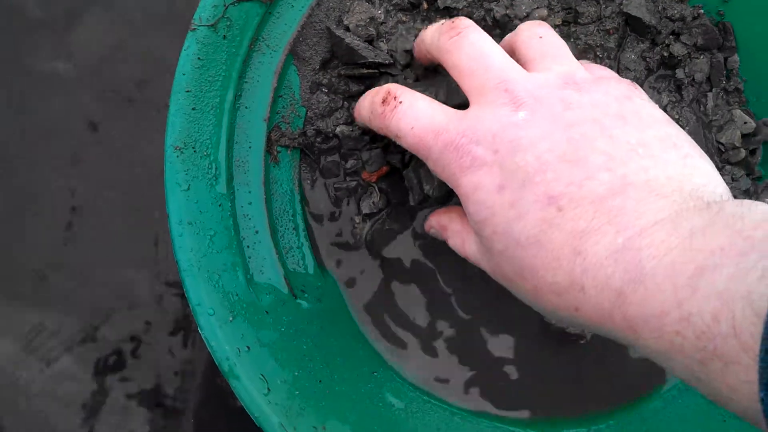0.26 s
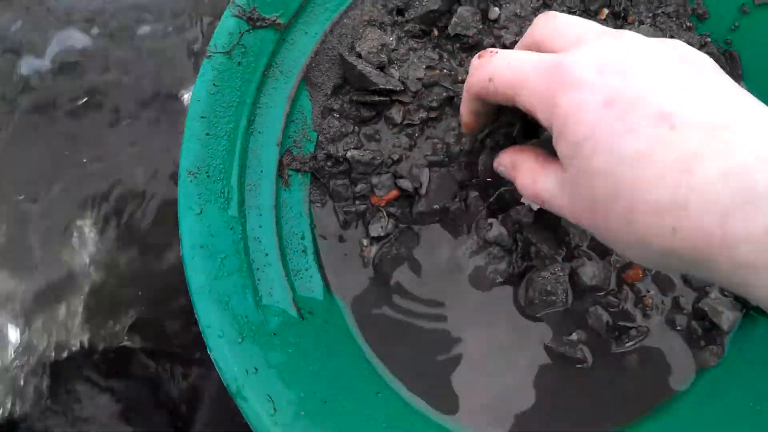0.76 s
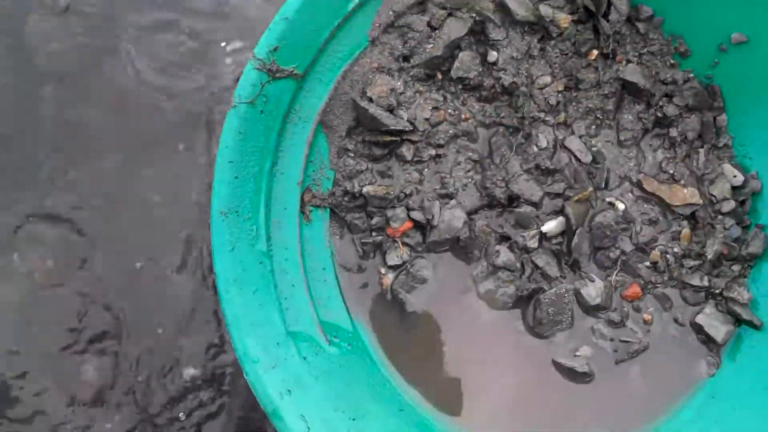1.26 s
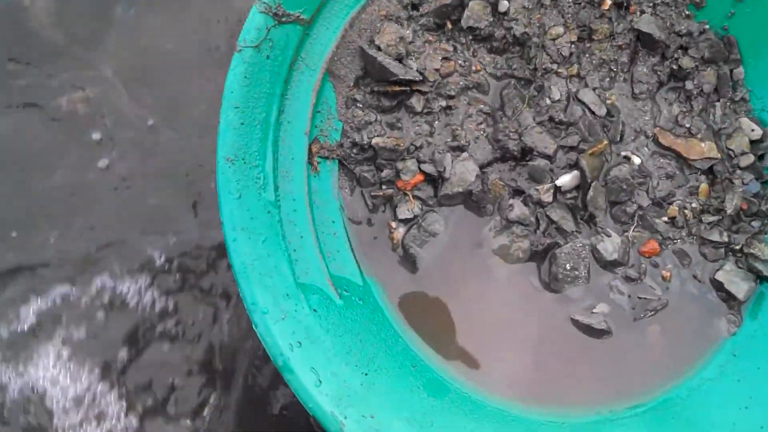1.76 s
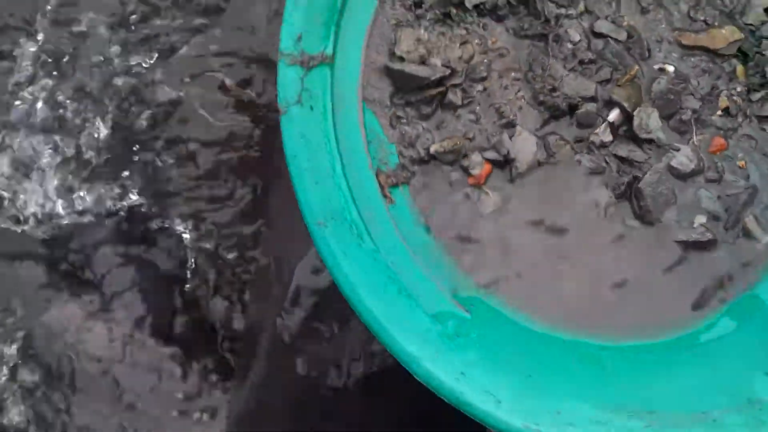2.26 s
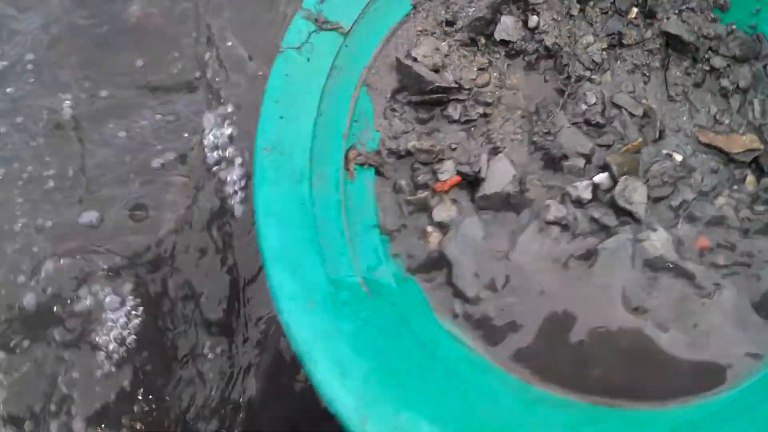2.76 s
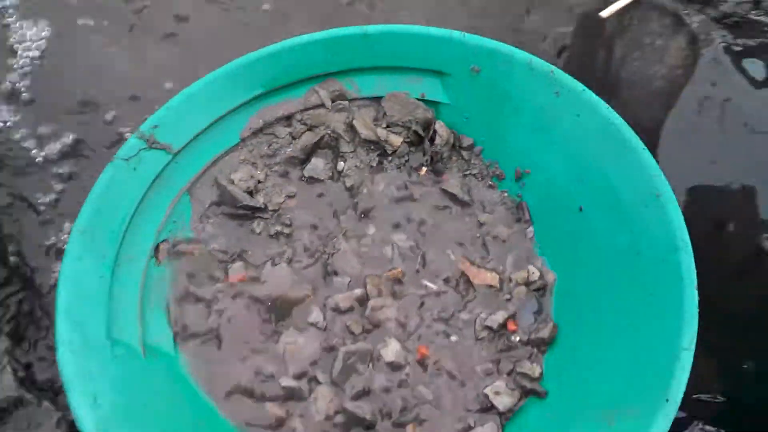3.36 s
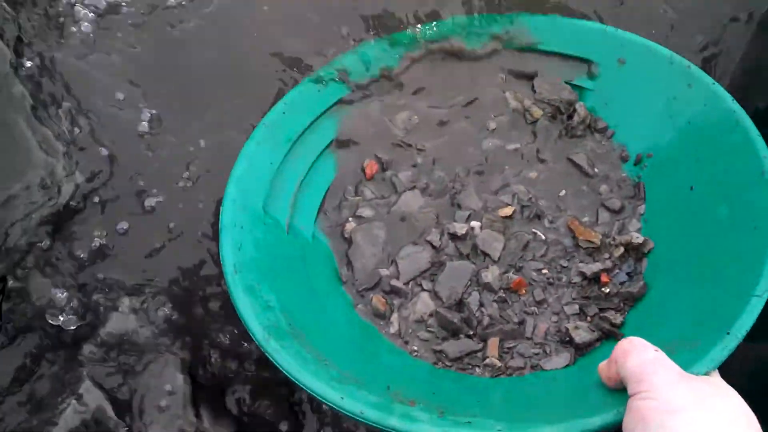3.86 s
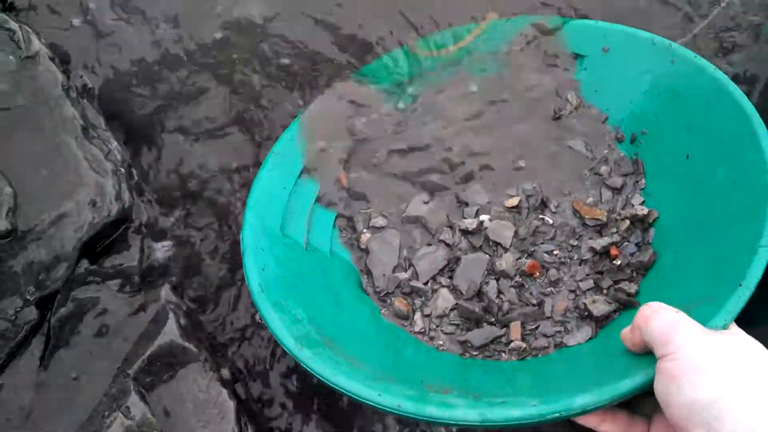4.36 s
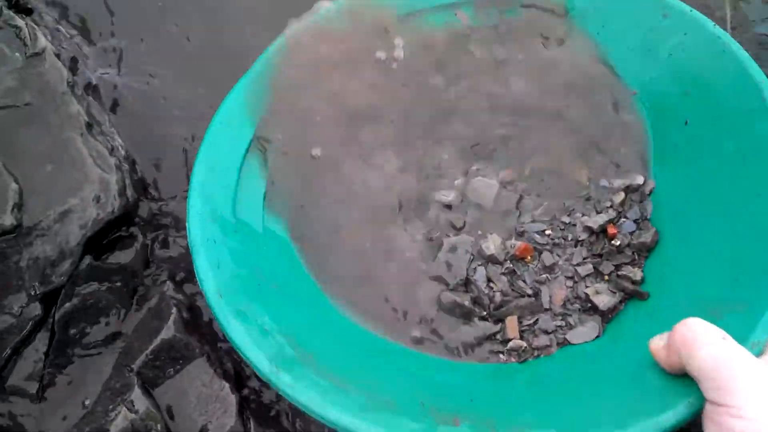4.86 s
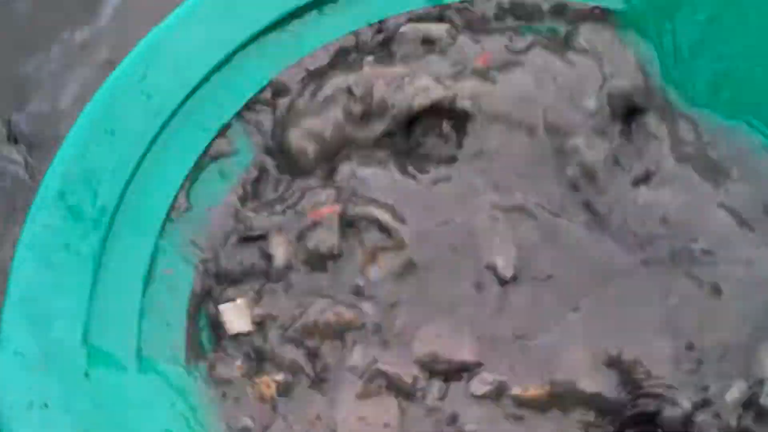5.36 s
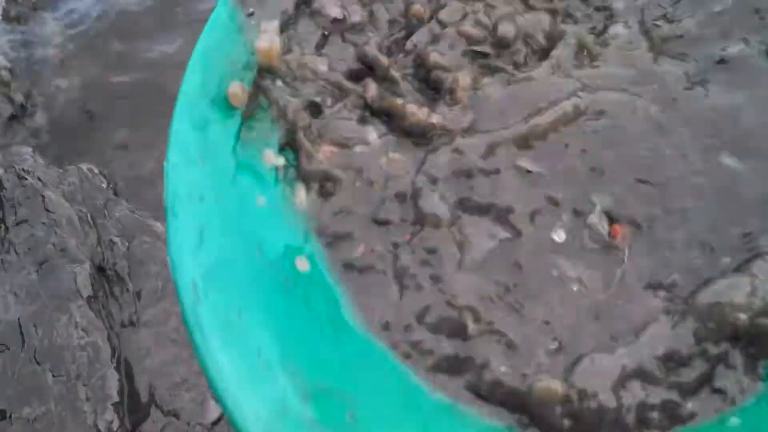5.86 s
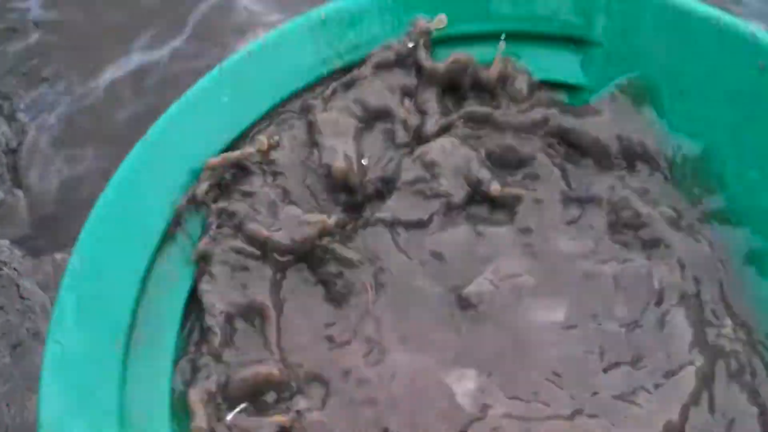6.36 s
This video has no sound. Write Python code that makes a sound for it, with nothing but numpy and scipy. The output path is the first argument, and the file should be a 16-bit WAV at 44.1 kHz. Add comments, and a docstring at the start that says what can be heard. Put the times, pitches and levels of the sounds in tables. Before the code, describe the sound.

Very close stereo sound at an open riverbank. From 0 to 3 seconds, gravel is stirred in a shallow plastic pan of water: irregular bubbly lapping, gurgling and bright fizz swell and fall several times a second, dotted with short pebble ticks, watery drips, hollow low plops and crackling spray, busiest around 2.3 to 2.9. Just after 3 the water drops away, leaving small drips, faint high river hiss and a sparse patter of droplets, with soft wind thumps around 3.3. From 4.2 splashing returns, brightest near 4.6, then loose swirling sloshes and knocks continue to the abrupt end at about 6.6. Wind rumbles low on the microphone throughout; after 4.8 its gusts grow strong, with heavy, boomy buffets near 4.9, 5.6 and 6.2, pushing the two sides in opposite phase. The space is dry, without noticeable echo.

```python
"""A pan of wet gravel is raked, lifted, dipped and shaken at a river's edge, close to two microphone ports.
For 3 s bubble swarms lap, gurgle and fizz under dying-sine drips, plops and filtered-noise spray.
The water thins for about a second, over a far hiss and patter, then sloshes again from 4.2 s.
Low noise rumbles as wind throughout, with the strongest gusts after 4.8 s; ringing eddies thump the ports.
Wind and thumps push the two ports in opposite phase."""
import sys
import numpy as np
from scipy import signal
from scipy.fft import rfft, irfft, next_fast_len
from scipy.io import wavfile
from scipy.ndimage import uniform_filter1d

SR = 44100
rng = np.random.default_rng(int(sys.argv[2]) if len(sys.argv) > 2 else 0)


def master(y):
    """Save y as 16-bit WAV."""
    cut = np.clip(np.atleast_2d(y).T, -1, 1)
    pcm = np.round(cut * 32767)  # scale
    wavfile.write(sys.argv[1], SR, pcm.astype(np.int16))


N = 291059


def gain_of(db):
    """Turns dB into an amplitude factor."""
    return 10 ** (np.asarray(db) / 20)


def evened(x):
    """Scales a signal to rms 1."""
    return x / np.sqrt(np.mean(x ** 2) + 1e-20)


def read(points, hz):
    """Reads a table on a log-frequency axis."""
    f, value = np.transpose(points)
    return np.interp(np.log(hz + 1), np.log(f + 1), value)


def curves(rows):
    """Draws the columns of a time table as straight lines, at every sample."""
    s, *columns = np.transpose(rows)
    return [np.interp(np.arange(N) / SR, s, column) for column in columns]


def add(mix, s, sound):
    """Mixes a sound in at time s."""
    part = mix[round(s * SR):][:len(sound)]
    part += sound[:len(part)]


def band_passed(noise, lo_hz, hi_hz, order=2):
    """Keeps one band of a noise."""
    sos = signal.butter(order, [lo_hz, hi_hz], "band", fs=SR, output="sos")
    return signal.sosfilt(sos, noise)


def wander(hz):
    """Slow random drift of rms 1: noise smoothed below hz."""
    sos = signal.butter(2, hz, fs=SR, output="sos")
    return evened(signal.sosfilt(sos, rng.standard_normal(N)))


def crests(s, db, rise_db_s, fall_db_s):
    """Summed power of swells that climb to a crest and fall away in straight dB slopes."""
    t = np.arange(0, N / SR + .01, .002)[:, None] - s
    slope_db = np.where(t < 0, rise_db_s * t, -fall_db_s * t)
    power = gain_of(2 * (db + slope_db)).sum(1)
    return np.interp(np.arange(N) / SR, t[:, 0] + s[0], power)


def bubble(hz, t60, glide, rise_cycles):
    """A dying sine of peak 1; positive glide lifts its pitch like a bubble nearing the surface."""
    t = np.arange(0, max(t60, .002), 1 / SR)
    ring = np.sin(2 * np.pi * hz * (t + glide * t ** 2 / t60)) * gain_of(-60 * t / t60)
    ring = ring * (1 - np.exp(-t * hz / rise_cycles))
    return ring / abs(ring).max()


def ports(x, aside, near=0):
    """Left port hears x; right hears it phase-turned, treble inverted and early, mixed with aside."""
    # phase by which the right port leads below the crossover: (f/Hz, lead/rad)
    lead = [(250, .1), (350, .3), (500, 1.), (1100, .55), (1700, -.13), (2600, -1.7), (3680, -3.14),
            (4400, -4.4), (5200, -5.2)]
    # likeness of the right port to the left, before near raises it: (f/Hz, likeness/0-1)
    likeness = [(300, .5), (800, .65), (1400, .97), (3000, .9), (5000, .55), (15000, .5)]
    # right port over left: (f/Hz, level/dB)
    balance = [(150, 0), (300, -3.5), (450, -3.5), (700, -1), (1200, 1), (3000, 0)]
    cross_hz, treble_lead_s = 5100, 1 / 2468

    size = next_fast_len(N + 4096)
    hz = np.fft.rfftfreq(size, 1 / SR)
    treble = 1 / (1 + (cross_hz / (hz + 1)) ** 24)
    low_turn = (1 - treble) * np.exp(1j * read(lead, hz))
    treble_turn = -treble * np.exp(2j * np.pi * hz * treble_lead_s)
    turn = low_turn + treble_turn

    same = read(likeness, hz)
    same = np.clip(same + near * (1 - same), 0, 1)  # near raises the likeness
    peaks = np.cos(np.pi * hz * treble_lead_s) ** 4
    same = same + (.97 - same) * treble * peaks  # nears .97 at multiples of 2468 Hz in the treble

    right = same * turn / abs(turn) * rfft(x, size) + np.sqrt(1 - same ** 2) * rfft(aside, size)
    return np.array([x, irfft(right * gain_of(read(balance, hz)), size)[:N]])


def river():
    """Bright far hiss of the river with a sparse patter of tiny droplets, as short noise bursts."""
    river_db = -60
    drops_per_s, drop_db, drop_decay_s = 25, -47, .0015  # drop_db: smallest drop, before the band filter
    drop_gain = gain_of(drop_db + 4.5 * np.minimum(rng.exponential(1, N), 3))
    drops = (rng.random(N) < drops_per_s / SR) * drop_gain
    life = signal.lfilter([1], [1, -np.exp(-1 / (drop_decay_s * SR))], drops)
    hiss_noise, patter_noise = rng.standard_normal((2, 2, N))
    hiss = band_passed(hiss_noise, 7500, 11500)
    patter = band_passed(life * patter_noise, 2600, 9000)
    return gain_of(river_db) * evened(hiss) + patter


def wind():
    """Turbulence as lumpy low noise whose top rises in gusts, plus ringing eddies, in opposite phase."""
    # breeze on the left port between gusts: (t/s, level/dB)
    breeze = [(0.0, -40), (.9, -46), (1.5, -43), (2.1, -47), (2.8, -42), (3.0, -54), (3.5, -41), (4.0, -44),
              (4.4, -41), (4.7, -52), (4.8, -28), (5.6, -21.5), (5.92, -31), (6.1, -28), (6.6, -24)]
    # gusts on the left port: (crest t/s, level/dB, time to die by 20 dB/s)
    gusts = [(0.0, -25.5, .2), (.26, -33, .15), (.38, -36, .3), (1.06, -28, .35), (1.63, -28, .33),
             (2.34, -34, .17), (2.7, -31, .3), (2.86, -33, .12), (3.16, -37, .14), (3.26, -24, .1),
             (3.41, -22, .13), (3.67, -34, .15), (4.21, -29, .1), (4.4, -35, .15), (4.52, -33, .1),
             (4.8, -26, .12), (4.96, -16, .22), (5.57, -21, .12), (5.82, -21, .12), (5.96, -24, .1),
             (6.03, -24, .1), (6.2, -20.5, .14), (6.36, -20, .2), (6.51, -19, .15)]
    # single eddies that thump the left port: (t/s, peak/dB, starting f/Hz)
    thumps = [(0.013, -12.5, 93.5), (.367, -16, 150), (1.026, -16, 64.4), (2.922, -15, 95),
              (3.245, -24, 149), (3.281, -14, 90), (3.376, -6, 110), (3.386, -5, 230), (4.211, -12.5, 109),
              (4.761, -6, 93), (4.917, -5, 193), (4.97, -9, 170), (4.977, -7, 125), (4.99, -7, 210),
              (5.027, -11, 151), (5.042, -7, 173), (5.613, -5, 200), (5.62, -4, 105), (5.633, -5, 190),
              (5.639, -6, 140), (5.649, -8, 200), (5.719, -12, 170), (6.091, -6, 87), (6.184, -10, 140),
              (6.195, -4, 160), (6.207, -11, 130), (6.302, -11, 101), (6.343, -12, 90), (6.473, -11, 160),
              (6.492, -8, 224)]
    rise_share = .55  # rise time as a share of the dying time
    facing_db = 4.9  # the right port faces the wind
    apart_gain = .1  # wind that is not in opposite phase

    s, db, dying = np.transpose(gusts)
    gust_power = crests(s, db, 20 / (rise_share * dying), 20 / dying)
    level_db = 10 * np.log10(gain_of(2 * curves(breeze)[0]) + gust_power)

    hz, t, z = signal.stft(rng.standard_normal((2, N)), SR, nperseg=1024, noverlap=768)
    top_hz = 78 * gain_of(0.2 * (np.interp(t, np.arange(N) / SR, level_db) + 48))
    shape = 1 / (1 + (hz[:, None] / top_hz) ** 2.5)
    shape = shape / np.sqrt((shape ** 2).mean(0))  # the moving top leaves the power steady
    rumble, apart = signal.istft(z * shape, SR, nperseg=1024, noverlap=768)[1][:, :N]

    lumps = gain_of(level_db) * evened(gain_of(2.5 * wander(18)))
    push = evened(rumble) * lumps
    for s, db, hz in thumps:
        add(push, s, gain_of(db) * bubble(hz, 3.3 / hz, -0.17, 0.2))  # pitch sinks
    return np.array([push, -gain_of(facing_db) * push]) + apart_gain * evened(apart) * lumps


def singles():
    """Drips and most plops ring for many cycles, ticks and short knocks for few; spray crackles brightly."""
    # clear drips and pebble ticks, the ticks being the short ones: (t/s, peak/dB, starting f/Hz, t60/s)
    drips = [(0.042, -17, 1580, 0.008), (0.409, -13.5, 1400.0, 0.024), (0.5017, -8.5, 1604.0, 0.01),
             (0.682, -11.5, 1490.0, 0.0043), (0.8347, -9.5, 1300, 0.008), (1.0894, -5.5, 1680, 0.0046),
             (1.4667, -4.5, 1894.0, 0.0025), (1.5543, -15.5, 670, 0.018), (1.6094, -11, 1291.0, 0.011),
             (1.7283, -9.4, 1400, 0.019), (1.751, -9, 2600, 0.0054), (1.7981, -5, 2630, 0.0061),
             (1.973, -17, 1030.0, 0.03), (2.0761, -11.5, 1700, 0.0069), (2.1495, -6.5, 1760, 0.0087),
             (2.35, -9, 3100.0, 0.004), (2.363, -8, 2000, .008), (2.549, -11, 2100, .008),
             (2.4353, -7, 3030, 0.0057), (2.576, -10, 1320, 0.017), (2.727, -11, 1670, 0.0068),
             (2.7893, -8, 1220, 0.011), (2.9264, -14, 3300, 0.0036), (2.935, -16.5, 1500, 0.011),
             (3.028, -31, 3500, .01), (3.167, -29, 1880, .015), (3.2484, -15, 2282.0, 0.0029),
             (3.256, -13, 3170, 0.0035), (3.2587, -16, 1679.0, 0.0078), (3.4202, -24, 2470, 0.014),
             (3.522, -26, 950, .015), (3.537, -23, 1162.0, 0.012), (3.5872, -24.5, 2340, 0.016),
             (3.7066, -27, 5100, 0.008), (3.723, -23, 2300, 0.005), (3.8066, -21, 2583.0, 0.0036),
             (3.876, -27, 3470, 0.005), (3.9966, -16, 2350, 0.027), (4.046, -26, 1520, .014),
             (4.071, -28, 5167.0, 0.005), (4.1886, -20, 1820, 0.02), (4.2409, -19, 870, 0.007),
             (4.337, -11.5, 2310, 0.012), (4.338, -12, 1000, 0.012), (4.4485, -11, 1660, 0.0066),
             (4.5474, -14, 3600, 0.004), (4.576, -6.5, 2380, 0.018), (4.617, -10, 2110.0, 0.011),
             (4.626, -5, 2780, 0.0037), (4.627, -9, 900, 0.012), (5.026, -11, 1500, .008),
             (4.8686, -15, 1330.0, 0.007), (4.9661, -8.5, 1110, 0.009), (5.043, -12, 980, 0.014),
             (5.1411, -12, 1750, 0.009), (5.24, -10, 1180, 0.008), (5.2555, -6, 1690, 0.0031),
             (5.2705, -13, 1894.0, 0.012), (5.271, -15, 1050, .025), (5.313, -12, 3700, 0.003),
             (5.4415, -5, 3700, 0.005), (5.442, -14, 760, .012), (5.7996, -17.3, 2627.0, 0.004),
             (5.8237, -10.9, 1550.0, 0.014), (5.895, -17, 1064.0, 0.023), (6.1428, -12, 732.0, 0.013),
             (6.293, -17, 1090, 0.011), (6.3377, -14.6, 1220, 0.0062), (6.3758, -15.5, 1360, 0.007),
             (6.5798, -17.5, 1140.0, 0.0097)]
    # hollow plops of water against the pan: (t/s, peak/dB, f/Hz before plop_pitch, t60/s)
    plops = [(0.293, -19, 587, 0.08), (.367, -9.5, 600, 0.05), (.383, -6.5, 660, 0.03),
             (.597, -10, 560, .03), (.604, -8.5, 469, 0.045), (.98, -19, 384, 0.039),
             (1.244, -18, 305, 0.023), (1.457, -21.5, 363, 0.049), (1.522, -20.5, 283, 0.052),
             (1.678, -18, 480, 0.02), (1.806, -4, 430, 0.008), (1.81, -16, 350, .07),
             (2.294, -15, 370, 0.055), (2.3295, -8, 430, .008), (2.339, -11, 400, 0.03),
             (2.365, -19, 410, .05), (2.605, -18, 300, 0.046), (2.627, -17, 330, .04),
             (2.658, -18, 220, .04), (2.677, -16, 270, .03), (2.703, -16, 315, 0.03),
             (2.713, -13, 340, .02), (2.726, -11, 400, 0.04), (2.937, -3, 410, 0.009),
             (3.237, -18, 680, 0.04), (3.717, -23, 700, 0.015), (4.504, -15, 550, 0.049)]
    # short splashes of spray: (t/s, level before its envelope/dB, t60/s)
    sprays = [(1.055, -24, .03), (1.146, -22, 0.034), (1.349, -22, .03), (1.386, -23, .03),
              (1.758, -18.5, .026), (2.056, -19.5, 0.032), (2.545, -16, 0.025), (2.766, -18, 0.036),
              (2.788, -18.5, 0.041), (2.83, -16, 0.017), (2.874, -22, .012), (2.925, -18.5, .02),
              (3.238, -25, 0.049), (3.251, -20, 0.045), (4.221, -27, 0.025), (4.336, -18, 0.022),
              (4.468, -14, 0.018), (4.604, -16, .015), (4.615, -20, .012), (4.625, -10.5, 0.018),
              (4.663, -16.5, 0.022), (5.24, -20.5, 0.033), (5.311, -22, 0.018), (5.441, -21, 0.018),
              (5.803, -23, 0.02)]
    plop_pitch = 0.92  # starting pitch over the listed one

    mix = np.zeros(N)
    for (s, db, hz, t60), glide in zip(drips, rng.uniform(0.0073, 0.23, len(drips))):
        rise_cycles = min(1.8, .09 * hz * t60)  # short ticks start abruptly
        add(mix, s, gain_of(db) * bubble(hz, t60, glide, rise_cycles))

    for (s, db, hz, t60), luck in zip(plops, rng.random((len(plops), 4, 2))):
        rise_cycles = min(.8, .06 * hz * t60)  # short knocks start abruptly
        add(mix, s, gain_of(db) * bubble(hz * plop_pitch, t60, 0.25, rise_cycles))
        for late, pitch in luck:  # each plop breaks into smaller ones around its pitch
            small = bubble(hz * (.65 + 1.3 * pitch), .55 * t60, 0.3, 0.8)
            add(mix, s + .6 * t60 * late, gain_of(db - 13) * small)

    t = np.arange(4000) / SR
    for (s, db, t60), noise in zip(sprays, rng.standard_normal((len(sprays), 4000))):
        crackle = evened(band_passed(noise ** 3, 1400, 7200))  # cubing leaves separate droplets
        fade = gain_of(db - 60 * t / max(t60, .005))
        add(mix, s, fade * (1 - np.exp(-t / 0.002)) * crackle)

    # scatter off rim and rocks, t60 11 ms
    scatter = rng.standard_normal(900) * gain_of(-60 * np.arange(900) / SR / 0.011)
    return np.array([mix, signal.oaconvolve(mix, scatter / np.linalg.norm(scatter))[:N]])


def ripples():
    """Ripples break in sudden jumps and die away: a random sawtooth of rms 1."""
    ripples_per_s, decay_s = 20, .03  # decay before the square root below
    jumps = (rng.random(N) < ripples_per_s / SR) * rng.exponential(1, N)
    saw = np.sqrt(signal.lfilter([1], [1, -np.exp(-1 / (decay_s * SR))], jumps) + .05)
    return evened(saw - saw.mean())


def stirring():
    """Gains of lapping, gurgle and fizz: the power of the slowly changing water plus that of each slosh."""
    # slowly changing water under the sloshes: (t/s, lapping level/dB, gurgle level/dB, fizz level/dB)
    under = [(0.0, -38, -37, -43), (0.22, -33, -29, -35), (0.42, -27, -21.5, -30), (0.75, -29, -23, -29.5),
             (1.02, -36, -27, -35), (1.25, -40, -34.5, -39), (1.55, -33, -28, -35), (2.0, -32, -25, -31.5),
             (2.25, -34, -28, -33.5), (2.55, -30, -24.5, -28.5), (2.92, -42, -28, -40),
             (2.99, -46, -42, -49), (3.2, -47, -44, -50), (3.5, -40, -37.5, -44), (4.1, -39, -41, -52),
             (4.35, -31.5, -27.5, -34.5), (4.73, -35, -33.5, -41.5), (4.88, -34, -27, -35),
             (5.1, -39, -30, -40), (5.4, -39, -27, -35), (5.68, -44, -35, -46), (6.1, -38, -30, -39),
             (6.6, -35, -28.5, -36)]
    # sloshes over the gravel: (crest t/s, gurgle level/dB, brightness/dB: fizz up, lapping down)
    sloshes = [(.235, -26, 1), (.37, -24, -3), (.505, -20, -1), (.65, -25, 2), (1.08, -25, 2.5),
               (1.37, -31, 1), (1.56, -30, 2), (1.615, -28, 4), (1.77, -22, 2), (1.93, -28, 4),
               (2.12, -24, 1), (2.36, -19, -1), (2.46, -23, 4), (2.67, -27, -2), (2.79, -26, 3),
               (3.27, -32, 4), (3.38, -37, -7), (3.72, -39, 0), (3.9, -36, -1), (4.08, -36, 2),
               (4.23, -33, -1), (4.342, -30, 1), (4.465, -26.5, 1), (4.55, -27, 1), (4.6, -22.5, 4),
               (4.79, -27, 1), (5.0, -22, -2), (5.15, -30, -1), (5.245, -23.5, 2), (5.275, -23.5, -1),
               (5.55, -27, 3), (5.62, -29, -6), (5.71, -31, 1), (5.82, -28, 1), (5.91, -24, -1),
               (6.09, -27, 0), (6.3, -25, 1), (6.52, -29, 1)]
    rise_db_s, fall_db_s = 450, 150  # dB per s before and after the crest
    lap_db, fizz_db = -7.5, -7.5  # against the gurgle, at brightness 0
    lap_tilt = 1.5  # dB of lapping lost per dB of brightness

    s, db, bright_db = np.transpose(sloshes)
    slosh_levels = db + lap_db - lap_tilt * bright_db, db, db + fizz_db + bright_db
    gains = []
    for under_db, slosh_db in zip(curves(under), slosh_levels):
        slosh_power = crests(s, slosh_db, rise_db_s, fall_db_s)
        gains.append(np.sqrt(gain_of(2 * under_db) + slosh_power))
    return gains


def swarm(lo_hz, hi_hz, per_s, cycles, spread_db, wash, clumps, count=30):
    """Trains of small bubbles, a few large, swell in patches of near pitch over a smooth distant wash."""
    # colour of the water: (f/Hz, level/dB)
    colour = [(120, -12), (250, -2.5), (430, 0), (750, -1), (1100, -.5), (1800, -1.5), (2700, -4.5),
              (3800, -7.5), (5500, -15), (8500, -23.5), (15500, -36)]
    patch_db = 1.3  # unevenness over time and pitch

    grains, wash = np.zeros(N), np.clip(wash, 0, 1)
    patches = rng.standard_normal((N // 441 + 1, count))  # one row every 10 ms
    patches = uniform_filter1d(patches, size=5, axis=0)
    patches = evened(uniform_filter1d(patches, size=6, axis=1))
    pitches = lo_hz * (hi_hz / lo_hz) ** ((np.arange(count) + .5) / count)
    for hz, patch in zip(pitches, patches.T):
        when, luck, sign = rng.random((2000, 3))[:int(per_s / count * N / SR)].T
        luck_db = spread_db * np.minimum(-np.log(luck + 1e-9), 4)
        swell_db = patch_db * patch[(when * len(patch)).astype(int)]
        size = gain_of(luck_db + swell_db) * np.sign(sign - .5)
        length = .3 if rng.random() < 1 / 6 else 1.1  # about a sixth of the trains are dull ticks of grit
        ring = bubble(hz, 3 * cycles * length / hz, rng.uniform(-0.074, 0.39), 0.62)
        ring = ring / np.linalg.norm(ring) * np.sqrt(hz)  # equal power per Hz
        at = (when * N).astype(int)[:, None] + np.arange(len(ring))
        grains += np.bincount(at.ravel(), (size[:, None] * ring).ravel(), N)[:N]

    hiss = band_passed(rng.standard_normal(N), lo_hz, hi_hz, order=3)
    mix = np.sqrt(1 - wash) * evened(grains) + np.sqrt(wash) * evened(hiss)
    fft_size = next_fast_len(N)
    tint = gain_of(read(colour, np.fft.rfftfreq(fft_size, 1 / SR)))
    return evened(irfft(rfft(mix * clumps, fft_size) * tint, fft_size)[:N])


def water():
    """Three swarms follow the stirring and clump as ripples break; each port has bubbles of its own."""
    # lapping, gurgle and fizz: (lowest f/Hz, highest f/Hz, bubbles per s, ring length/cycles before
    # scaling in swarm, spread/dB per step of exponential luck, power share of smooth wash/0-1)
    swarms = [(139, 602, 330, 7.1, 4, 0.24), (580.3, 2937, 1500, 18, 2.6, 0.12),
              (2850, 15000, 2400, 22, 4.5, 0.35)]
    ripple_db, flutter_db = 1.4, 0.7  # rms depth of the clumping

    shared, mix = ripples(), np.zeros((2, N))
    for gain, row in zip(stirring(), swarms):
        clumps = gain_of(ripple_db * shared + flutter_db * wander(40))
        clumps = clumps / np.sqrt(uniform_filter1d(clumps ** 2, 11000))  # level over 0.25 s stays even
        mix += [gain * swarm(*row, clumps) for port in range(2)]
    return mix


def scene():
    """River, water and single bubbles reach the two ports; wind pushes on them directly."""
    return ports(*river()) + wind() + ports(*singles(), near=.85) + ports(*water())


def record(dry):
    """Bass cut, soft overload, then the treble limit."""
    bass_hz, ceiling, edge_hz = 48, .96, 15500
    cut = signal.sosfilt(signal.butter(4, bass_hz, "high", fs=SR, output="sos"), dry)
    held = cut / (1 + abs(cut / ceiling) ** 6) ** (1 / 6)
    low_pass = signal.firwin(511, edge_hz, window=("kaiser", 9), fs=SR)
    return signal.oaconvolve(held, low_pass[None], "same")


dry = scene()
out = record(dry)
master(out)
```